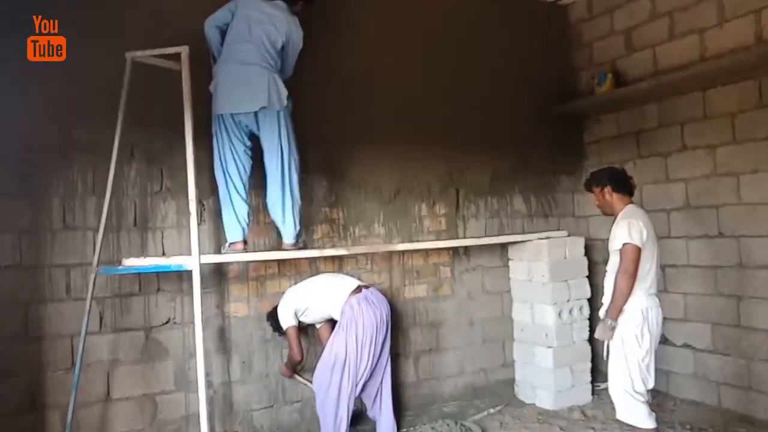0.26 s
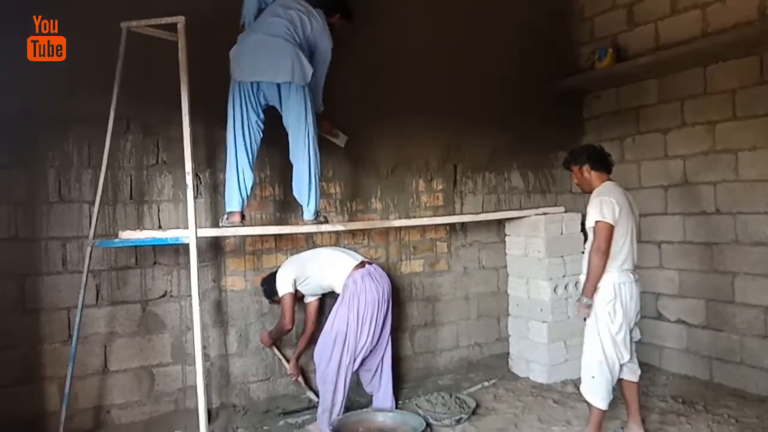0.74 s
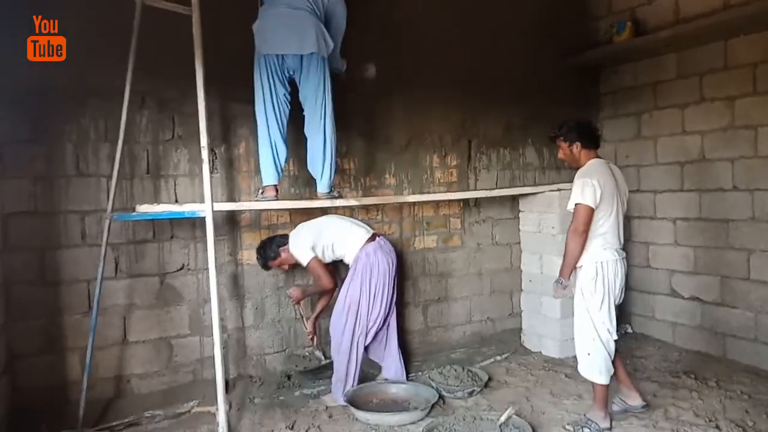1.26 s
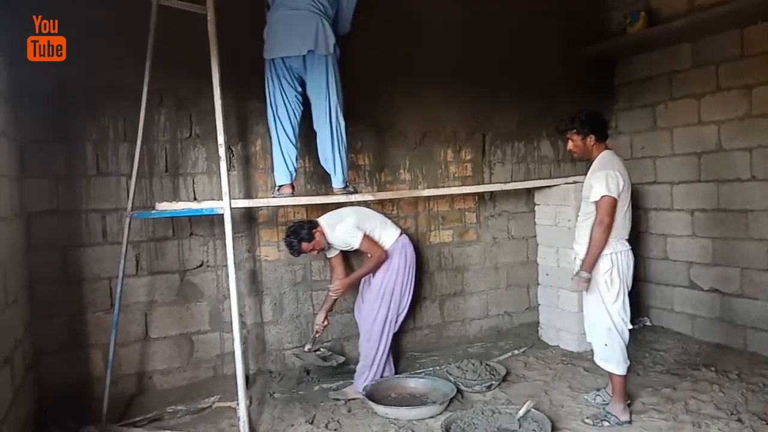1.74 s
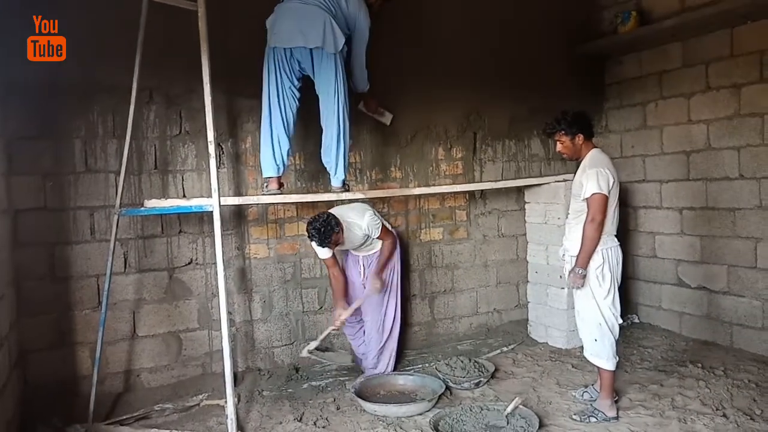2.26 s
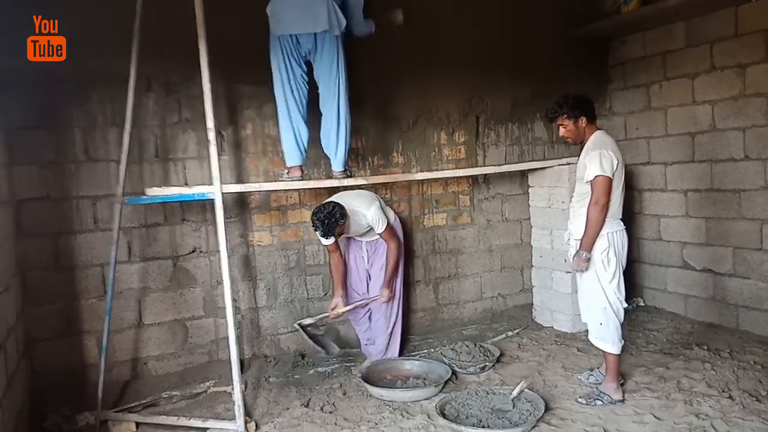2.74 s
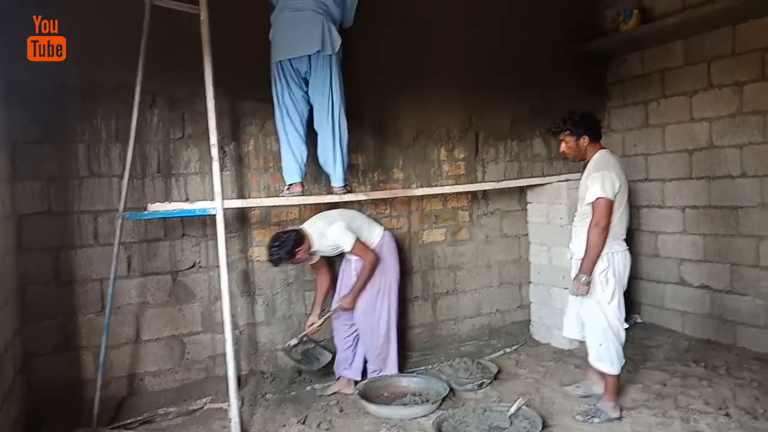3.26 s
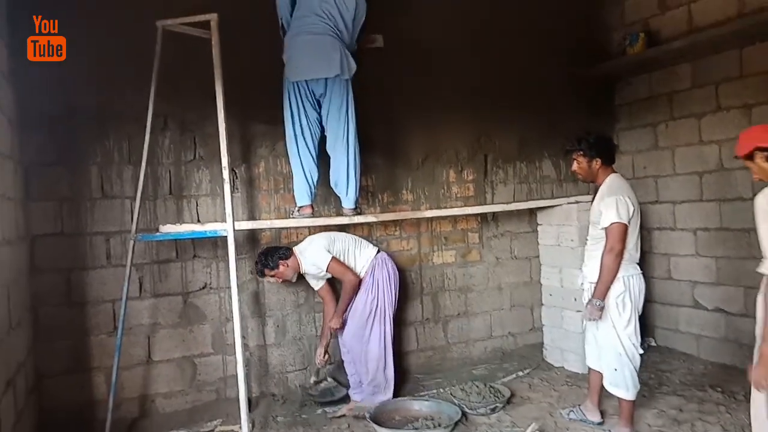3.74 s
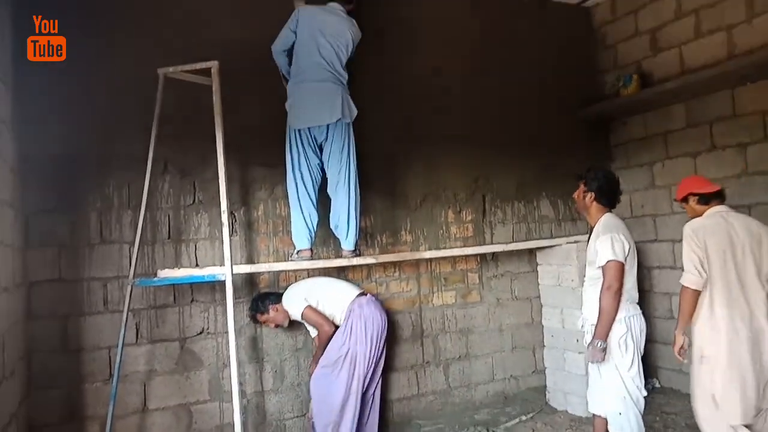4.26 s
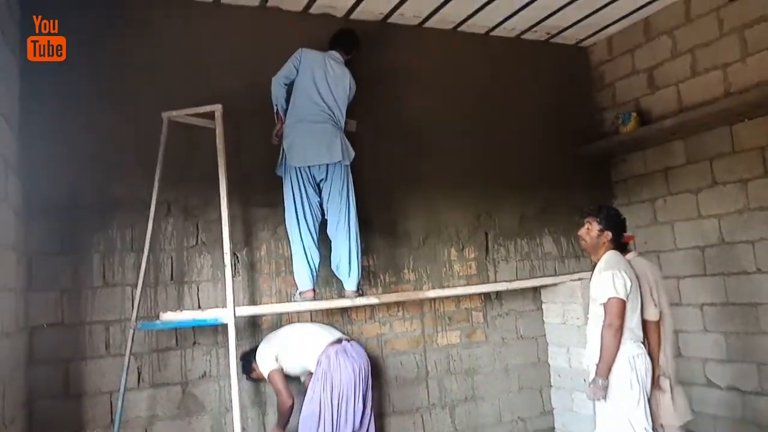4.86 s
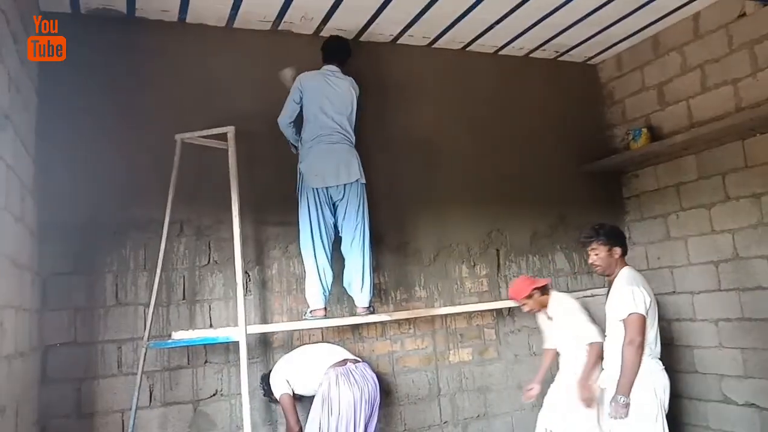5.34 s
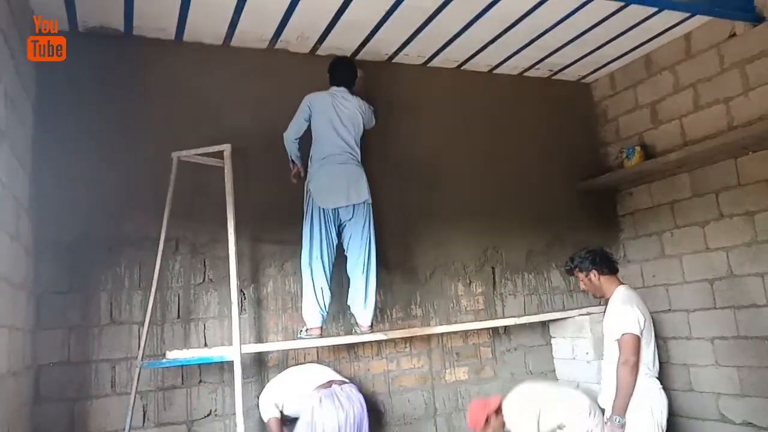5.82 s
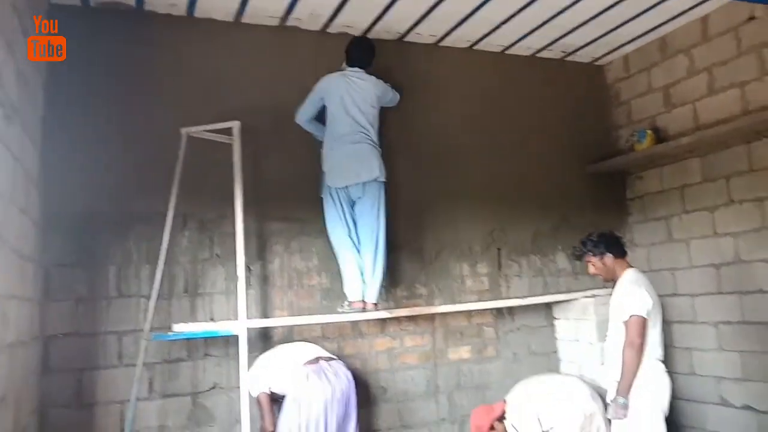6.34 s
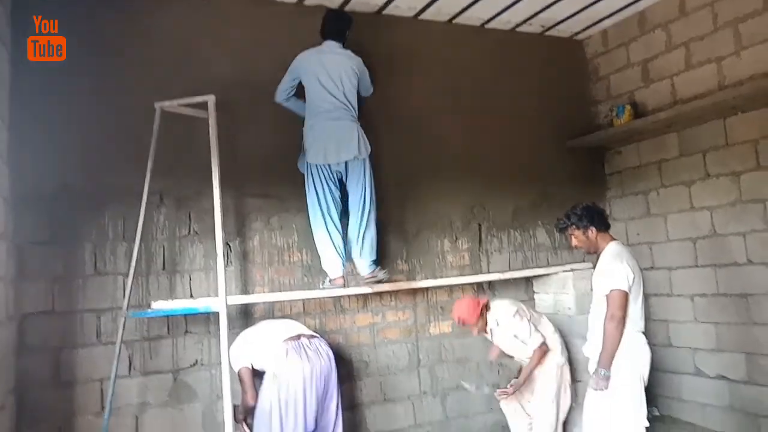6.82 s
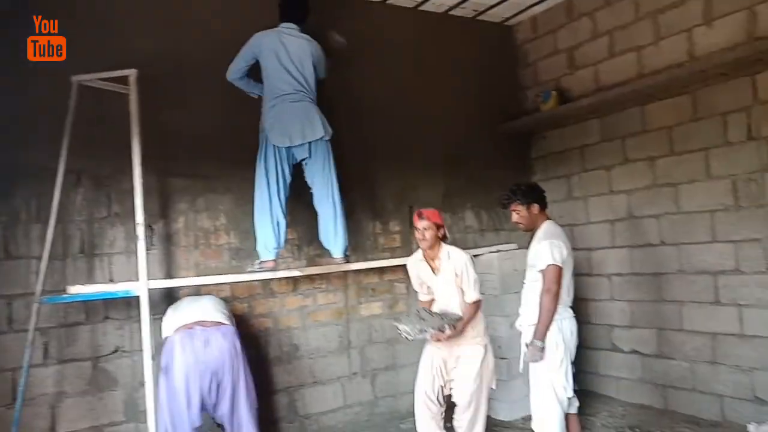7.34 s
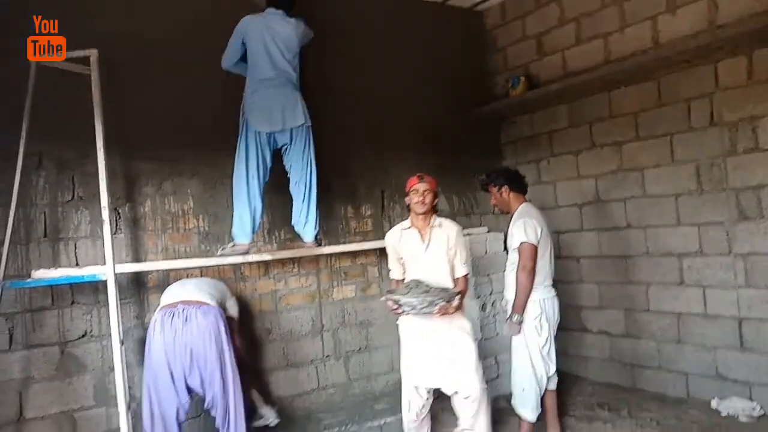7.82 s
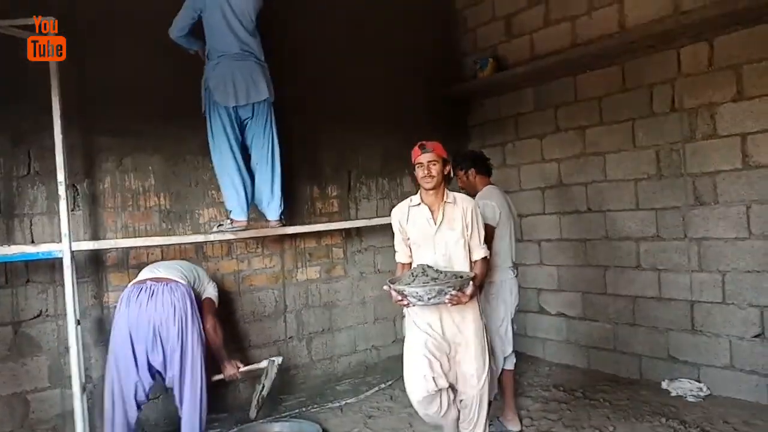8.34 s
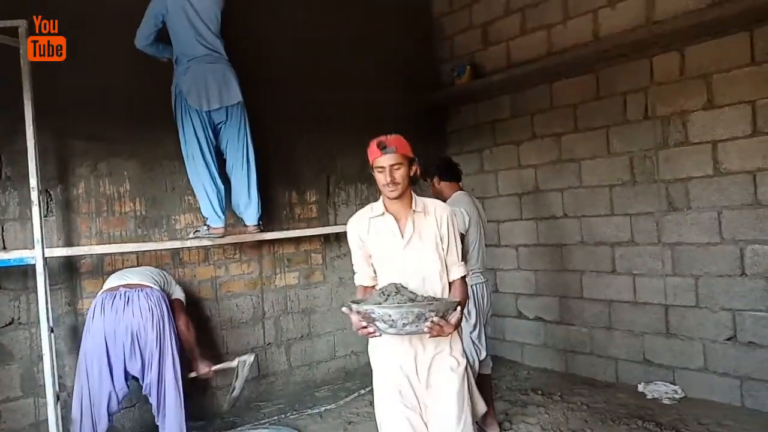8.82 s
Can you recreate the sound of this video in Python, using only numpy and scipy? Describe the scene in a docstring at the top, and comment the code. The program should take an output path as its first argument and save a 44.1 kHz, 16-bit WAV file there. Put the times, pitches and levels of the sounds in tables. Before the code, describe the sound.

In a bare block room, a steel trowel sweeps wet mortar in hissing, rasping strokes. A shovel crunches and scrapes at the start, then clanks sharply once. After calmer strokes, wet clods plop, a pan drags and trowelling becomes nearly continuous, before a hard shovel scrape near the end. Heard from a few metres away with short wall reflections; a slow distant engine barely thuds in the background.

```python
"""Bare block room, plastering: a steel trowel sweeps sandy wet mortar over the wall in hissing, rasping strokes.
A shovel scrapes, jabs and clanks on the gritty floor, a pan is dragged, wet clods flop down.
Far off, a slow single-cylinder engine thuds under a faint outdoor wash.
Friction is coloured random grains under motion envelopes; steel is ringing modes; clods are band-passed grains.
The walls add reflections; quiet pauses are turned down and the top is cut steeply."""
import sys
import numpy as np
from scipy import signal
from scipy.fft import rfft, irfft, next_fast_len
from scipy.io import wavfile
from scipy.ndimage import uniform_filter1d

SR = 44100
rng = np.random.default_rng(int(sys.argv[2]) if len(sys.argv) > 2 else 0)


def to_wav(s):
    """Save 16-bit WAV."""
    ch = np.atleast_2d(s).T  # columns
    pcm = np.round(np.clip(ch, -1, 1) * 32767)  # PCM
    wavfile.write(sys.argv[1], SR, pcm.astype(np.int16))


N = 400428
TIME = np.arange(N) / SR


def from_db(db):
    """Decibels to gain."""
    return 10 ** (np.asarray(db) / 20)


def rms_one(x):
    """Scale to rms 1."""
    return x / np.sqrt(np.mean(x ** 2) + 1e-20)


def at_hz(points, hz, axis=1):
    """Read one table column on a log-frequency axis."""
    points = np.array(points)
    return np.interp(np.log(np.maximum(hz, 1)), np.log(points[:, 0]), points[:, axis])


def coloured(x, spectrum):
    """Filter a steady signal by a spectrum table; rms 1."""
    gain = from_db(at_hz(spectrum, np.fft.rfftfreq(N, 1 / SR)))
    return rms_one(irfft(rfft(x) * gain, N))


def filtered(x, order, cutoff_hz, kind):
    """Butterworth filter."""
    return signal.sosfilt(signal.butter(order, cutoff_hz, kind, fs=SR, output="sos"), x)


def drift(knots_per_s):
    """Random wander of rms 1: straight lines between random knots."""
    knots = rng.standard_normal(8000)
    return rms_one(np.interp(TIME * knots_per_s, np.arange(len(knots)), knots))


def grains(per_s, spread_db):
    """Random clicks of uneven size and either sign; rms 1."""
    sizes = from_db(spread_db * np.minimum(rng.exponential(1, N), 4))
    signs = rng.choice([-1, 1], N)
    return rms_one(sizes * signs * (rng.random(N) < per_s / SR))


def fade(age_s, t60_s):
    """Exponential decay, 60 dB in t60_s."""
    return np.exp(-np.log(1000) * age_s / t60_s)


def ring(clicks, hz, t60_s):
    """Two-pole resonator: a unit click starts a decaying sine of height about 1."""
    r, w = fade(1 / SR, t60_s), 2 * np.pi * hz / SR
    return signal.lfilter([0, np.sin(w)], [1, -2 * r * np.cos(w), r * r], clicks + 1e-18)


def burst(start_s, t60_s, rise_s):
    """Envelope that rises quickly and dies away, at most 1 s long."""
    out, first = np.zeros(N), max(int(start_s * SR), 0)
    age = TIME[:min(SR, N - first)]
    out[first:first + len(age)] = (1 - np.exp(-age / rise_s)) * fade(age, t60_s)
    return out


# room acoustics: f/Hz, left-right likeness/0-1, t60/s
ROOM_ACOUSTICS = [(99.8, 0.87, 0.64), (315, 0.93, 0.26), (593, 0.73, 0.25), (1200, 0.09, 0.19),
                  (4000, 0.01, 0.14), (14000, 0.11, 0.099)]


def wall_echoes(build_s=0.0031):
    """Dense reflection tail for one source position, alike on both sides only in the bass."""
    size = next_fast_len(SR // 2)
    age, hz = TIME[:size], np.fft.rfftfreq(size, 1 / SR)
    mid, side = rfft(rng.standard_normal((2, size)))
    alike = np.clip(at_hz(ROOM_ACOUSTICS, hz), 0, 1)
    field = np.sqrt(1 + alike) * mid + np.sqrt(1 - alike) * side * [[1], [-1]]
    edges_hz, response = np.r_[0, np.geomspace(150, SR / 2, 8)], 0
    for low, high in zip(edges_hz, edges_hz[1:]):
        band = irfft(field * ((hz >= low) & (hz < high)), size)
        response = response + band * fade(age, at_hz(ROOM_ACOUSTICS, high, axis=2))
    built_up = response * (1 - np.exp(-age / build_s))
    # rough walls scatter all pitches about equally: keep the timing, level the colour
    scatter = np.exp(1j * np.angle(rfft(built_up)))
    return irfft(scatter, size)[:, :size // 2]


def room(x, direct_db, lag_s=0, moves_per_s=30, shift_db=20, count=4):
    """Direct sound plus reflections; with count > 1 their pattern shifts as the tool moves."""
    shares = from_db([shift_db * drift(moves_per_s) for _ in range(count)])
    shares /= np.sqrt(np.sum(shares ** 2, axis=0))
    echoes = sum(signal.oaconvolve((x * share)[None], wall_echoes(), axes=1)[:, :N] for share in shares)
    # a source on the right reaches the left side later
    direct = np.array([np.interp(TIME - lag_s, TIME, x), x])
    direct_gain = from_db(direct_db)
    return (echoes + direct_gain * direct) / np.sqrt(1 + direct_gain ** 2)


# outdoor wash spectrum: f/Hz, relative level/dB
AIR_SPECTRUM = [(25, -44), (60, 7), (140, -4), (300, -6), (700, -9), (1600, -10.5), (4000, -16),
                (7000, -25.5), (15000, -28)]


def air(level_db=-64.5, width_hz=500):
    """Faint outdoor wash through the open doorway: coloured noise, wide only above the bass."""
    mid, side = coloured(rng.standard_normal((2, N)), AIR_SPECTRUM)
    side = filtered(side, 1, width_hz, "high")
    return from_db(level_db) * (mid + side * [[1], [-1]])


FIRINGS_PER_S, FIRST_FIRING_S = 11.356, .043


def engine(level_db=-65.5, uneven_db=2.5, low_hz=52, high_hz=104, echo_db=-2.5, echo_t60_s=.3):
    """One exhaust puff per firing, blurred by outdoor echoes; only its bass carries this far."""
    firings = (np.arange(FIRST_FIRING_S, N / SR, 1 / FIRINGS_PER_S) * SR).astype(int)
    puffs = np.zeros(N)
    puffs[firings] = from_db(uneven_db * rng.standard_normal(len(firings)))
    tails = signal.lfilter([1], [1, -fade(1 / SR, echo_t60_s)], puffs)
    echoes = tails * rng.standard_normal(N)
    exhaust = rms_one(puffs) + from_db(echo_db) * rms_one(echoes)
    return from_db(level_db) * rms_one(filtered(exhaust, 3, [low_hz, high_hz], "band"))


def swelling(age_s, length_s, swell_db):
    """Gain that changes by swell_db over a movement, 0 dB at mid-way."""
    return from_db(swell_db * (np.clip(age_s / length_s, 0, 1) - .5))


def slide(start_s, length_s, swell_db, settle_s, attack_s=0.022):
    """Floor push: quick start, steady swell or wane, then the grit settles."""
    age = TIME - start_s
    attack = np.clip(age / attack_s, 0, 1)
    settling = np.exp(-np.clip((age - length_s) / settle_s, 0, 20))
    return attack * swelling(age, length_s, swell_db) * settling


# loaded pan modes: f/Hz, relative level/dB, t60/s
PAN_MODES = [(345, -9, .08), (455, -12, .06), (615, 0, .11), (700, -5, .08), (900, -8, .05)]
# steel mortar pan pulled over the floor:
# t/s, length/s, level/dB, swell/dB, settling time constant/s, pitch ratio (higher when empty)
PAN_PULLS = [(0.582, 0.16, -48.5, 11, 0.076, 1.17), (6.21, 0.45, -49, -1.5, 0.12, 1.0)]


def pan():
    """Grit catching under the pan sets its damped bowl droning."""
    catches, out = grains(per_s=350, spread_db=0.0), np.zeros(N)
    for start_s, length_s, db, swell_db, settle_s, ratio in PAN_PULLS:
        modes = [from_db(mode_db) * ring(catches, hz * ratio, t60_s) for hz, mode_db, t60_s in PAN_MODES]
        bowl = rms_one(sum(modes))
        out += from_db(db) * bowl * slide(start_s, length_s, swell_db, settle_s)
    return out


# wet mortar landing: t/s, level/dB (before gain_db), f/Hz, t60/s
MORTAR_CLODS = [(0.223, -32, 294, 0.083), (0.364, -32, 298, 0.091), (2.685, -34.5, 242, 0.36),
                (2.717, -33.5, 300, 0.32), (2.832, -34.5, 290, 0.24), (4.836, -49.5, 430, 0.075),
                (4.941, -38, 403, 0.034), (5.533, -37.5, 312, 0.25), (5.593, -47, 270, 0.37),
                (6.047, -46, 343, 0.17), (6.621, -40.5, 472, 0.28), (6.976, -36.5, 248.6, 0.35),
                (7.121, -45.5, 231.4, 0.13), (7.477, -43, 495, 0.08), (8.44, -48, 293, 0.075),
                (8.571, -35, 277, 0.59)]


def mortar(gain_db=0.5, width_ratio=1.566):
    """A clod lands as a cluster of soft, dull plops: band-passed grains."""
    plops, out = grains(per_s=2300, spread_db=3.0), np.zeros(N)
    for start_s, db, hz, t60_s in MORTAR_CLODS:
        envelope = burst(start_s, t60_s, rise_s=0.0024)
        thud = filtered(plops + 1e-18, 2, [hz / width_ratio, hz * width_ratio], "band")
        thud /= np.sqrt(np.average(thud ** 2, weights=envelope ** 2))
        out += from_db(db + gain_db) * envelope * thud
    return out


# shovel blade modes: f/Hz, relative level/dB, t60/s
BLADE_MODES = [(865, -8, .11), (1281, -8, .12), (1701, -7, .11), (1965, -7, .14), (2660, -7, .17),
               (2790, -7, .13), (2865, -4, .14), (3521, -10, .13), (3800, -8, .08), (4150, -7, .05),
               (4613, -16, .11)]
# impact noise spectrum: f/Hz, relative level/dB
CRACK_SPECTRUM = [(300, -22), (800, -12.5), (2000, 2.5), (4100, -3), (5200, -13.5), (7000, -21),
                  (11000, -43), (15000, -53)]
# blade striking the floor: t/s, level/dB (of the crack; ringing adds mode level and ring_db)
BLADE_CLANKS = [(1.668, -21), (7.956, -33.5)]
REBOUND_SPACING_S, REBOUND_DB = 0.018, -14  # spacing varies by up to 20 %


def shovel_clank(ring_db=-3.5, crack_t60_s=0.038, count=4):
    """Each contact and its rebounds crack on the concrete and ring the blade."""
    contacts = []
    for start_s, db in BLADE_CLANKS:
        for k in range(count):
            delay_s = k * REBOUND_SPACING_S * rng.uniform(.8, 1.2)
            contacts.append((start_s + delay_s, db + REBOUND_DB * (k > 0)))
    times_s, levels_db = np.transpose(contacts)
    cracks = sum(from_db(db) * burst(t, crack_t60_s, rise_s=0.00029) for t, db in contacts)
    out = coloured(rng.standard_normal(N), CRACK_SPECTRUM) * cracks
    for hz, mode_db, t60_s in BLADE_MODES:
        clicks = np.zeros(N)
        signs = rng.choice([-1, 1], len(times_s))
        clicks[(times_s * SR).astype(int)] = from_db(levels_db + mode_db + ring_db) * signs
        out += ring(clicks, hz, t60_s)
    return out


# crushed stones spectrum: f/Hz, relative level/dB
GRIT_SPECTRUM = [(40, -25), (120, -11.5), (350, -22.5), (620, 4), (1000, 1), (1350, 4.5), (2200, 3.5),
                 (3000, 0), (4200, -6), (5200, -13.5), (7000, -26.5), (10000, -43), (15000, -63.5)]
# shovel jabbing into grit: t/s, level/dB, t60/s
SHOVEL_JABS = [(0.004, -21, 0.04), (0.233, -34, .1), (0.52, -31.5, 0.077), (0.663, -33, 0.26),
               (2.736, -39, .15), (2.824, -39, 0.18), (4.9401, -32.5, 0.016), (5.594, -40, 0.065),
               (6.036, -39, 0.11), (6.592, -31, .05), (6.969, -39.5, 0.32), (7.958, -41, 0.11),
               (8.357, -26, 0.16), (8.379, -21.5, 0.055), (8.435, -20.5, 0.18)]


def shovel_jabs():
    """Each thrust crushes many small stones at once: bursts of coloured grains."""
    crunch = coloured(grains(per_s=4700, spread_db=-1.5), GRIT_SPECTRUM)
    return crunch * sum(from_db(db) * burst(t, t60_s, rise_s=0.00039) for t, db, t60_s in SHOVEL_JABS)


# rumble spectrum of the shovel's load: f/Hz, relative level/dB
LOAD_SPECTRUM = [(35, -48), (110, -19.5), (190, -31.5), (265, 3), (350, 6), (430, -0.5), (600, -5),
                 (1200, -13.5), (4000, -50.5)]
# shovel pushes: t/s, length/s, grit level/dB (before grit_gain_db), load level/dB, swell/dB,
# settling time constant/s
SHOVEL_PUSHES = [(0, .11, -41.5, -39.5, -13, 0.092), (0.177, .19, -35, -38, 3, 0.033),
                 (0.508, 0.14, -36, -50, 2.5, 0.071), (0.834, .25, -69, -62, 4.5, 0.021),
                 (1.847, 0.41, -65.5, -66, -0.5, 0.017), (3.133, 0.28, -62, -64, -0.5, 0.3),
                 (3.648, 0.044, -62, -61, -12, 0.033), (4.501, 0.11, -67.5, -66, -3, .04),
                 (4.83, 0.07, -60, -66.5, -9, 0.042), (5.736, .11, -47.5, -59, -12.5, 0.12),
                 (6.03, 0.18, -55, -67, -1, 0.021), (6.198, 0.25, -44.5, -52, 7, 0.17),
                 (7.068, 0.079, -58, -58.5, -13, 0.094), (7.474, 0.11, -69.5, -70, -2, 0.047),
                 (7.965, 0.18, -53, -63.5, -2, 0.029), (8.371, 0.075, -27.5, -32.5, 5.5, 0.026),
                 (8.535, 0.22, -55, -60, 7, .03), (8.747, 0.072, -40.5, -48, 1.5, 0.034)]


def shovel_scrape(grit_gain_db=3.0, slip_db=3.0, steel_db=-25.0):
    """The blade sticks and slips over stones, which crunch and ring it faintly; its load rumbles."""
    slip = from_db(slip_db * drift(knots_per_s=95))
    stones = grains(per_s=3000, spread_db=3.5)
    slides = np.array([slide(t, length_s, swell_db, settle_s)
                       for t, length_s, _, _, swell_db, settle_s in SHOVEL_PUSHES])
    grinding, weight = from_db(np.array(SHOVEL_PUSHES)[:, 2:4].T) @ slides
    steel = rms_one(sum(from_db(db) * ring(stones, hz, t60_s) for hz, db, t60_s in BLADE_MODES))
    crunch = rms_one(coloured(stones, GRIT_SPECTRUM) + from_db(steel_db) * steel)
    load = coloured(grains(per_s=1900, spread_db=2.5), LOAD_SPECTRUM)
    return slip * (crunch * grinding * from_db(grit_gain_db) + load * weight)


def stroke(start_s, length_s, swell_db, speed_up_s=.24, slow_down_s=0.19):
    """Trowel speed: the arm gets going, sweeps on while swelling or waning, and comes to rest."""
    age = TIME - start_s
    ease_in = np.sin(np.pi / 2 * np.clip(age / speed_up_s, 0, 1))
    ease_out = np.sin(np.pi / 2 * np.clip((length_s - age) / slow_down_s, 0, 1))
    return (ease_in * ease_out) ** 2 * swelling(age, length_s, swell_db)


# sand hiss spectrum: f/Hz, relative level/dB
SAND_SPECTRUM = [(150, -26), (500, -16), (950, -15.5), (1500, -9), (2300, -2.5), (3000, 1.5), (4100, 0),
                 (5000, -7), (6200, -11), (7500, -18), (9800, -20.5), (11500, -28), (14500, -20),
                 (16000, -32.5)]
# blade rasp spectrum before pitch shift: f/Hz, relative level/dB
RASP_SPECTRUM = [(300, -33), (700, -12.5), (1000, -12), (1550, 1), (1900, 5), (2400, 6.5), (3000, -5.5),
                 (4500, -22.5), (9000, -56)]
# trowel strokes: t/s, length/s, hiss level/dB, rasp level/dB (both before gains), wet film level/dB,
# swell/dB
TROWEL_STROKES = [(-.3, 0.52, -36, -43, -66, -31), (0.03, 0.86, -56, -75, -74, -5),
                  (1.02, 0.72, -44, -60, -58, 2.5), (2.44, 0.73, -41.5, -47.5, -70, 2),
                  (3.645, 0.68, -47, -54.5, -57, 10), (4.816, 0.72, -45.5, -52.5, -51.5, 0.5),
                  (5.384, 0.709, -50.5, -54, -54.5, 2), (5.93, 0.45, -48.5, -53, -54.5, -10),
                  (6.207, 0.63, -49, -49.5, -53.5, -2), (6.552, 0.72, -51.5, -61, -57, -9),
                  (6.991, 0.38, -48, -53, -51, -8), (7.2, 0.59, -49.5, -72, -56, 2),
                  (7.573, 0.6, -50, -74, -55, 4), (7.948, 0.36, -50.5, -71, -63, -7),
                  (8.135, 0.66, -48, -66, -61, -3), (8.539, 0.64, -53, -76, -59.5, -5.5)]
# blade biting into the mortar: t of peak/s, level/dB (before gains), build-up and ease-off time constant/s,
# rasp pitch shift/octaves
TROWEL_BITES = [(0.01, -24, 0.02, 0.18), (1.28, -36, 0.062, -0.086), (1.654, -41, 0.034, -0.25),
                (1.915, -55.5, 0.023, 0.13), (2.57, -35.5, 0.045, -0.17), (3.685, -57, 0.027, .5),
                (4.885, -56, 0.023, 0.38), (5.022, -35, .04, .35), (5.36, -40.5, 0.036, .3),
                (7.971, -37.5, .018, 0.053)]
BITE_HISS_DB = -7  # a bite also drags more sand
TILT_S, FILM_HZ = .13, 6000  # pitch slide time constant; wet film sizzles above this


def trowel(hiss_gain_db=3.0, rasp_gain_db=3.0, judder_db=0.6):
    """Sand hisses, wet film sizzles; pressing harder makes the blade rasp, its pitch sliding with tilt."""
    judder = from_db(judder_db * drift(knots_per_s=55))
    speeds = np.array([stroke(t, length_s, swell_db) for t, length_s, _, _, _, swell_db in TROWEL_STROKES])
    # overlapping strokes add in power
    stroke_gains = from_db(np.array(TROWEL_STROKES)[:, 2:5].T)
    sweep, pressure, wetness = np.sqrt(stroke_gains ** 2 @ speeds ** 2)
    bites = sum(from_db(db) * np.exp(-np.minimum(abs(TIME - t) / ease_s, 20))
                for t, db, ease_s, _ in TROWEL_BITES)
    tilt_octaves = sum(octaves * np.exp(-np.minimum(((TIME - t) / TILT_S) ** 2, 20))
                       for t, _, _, octaves in TROWEL_BITES)
    hiss = coloured(grains(per_s=9000, spread_db=5.5), SAND_SPECTRUM)
    hiss *= np.hypot(sweep, from_db(BITE_HISS_DB) * bites) * from_db(hiss_gain_db)
    sizzle = coloured(grains(per_s=4000, spread_db=3.5), SAND_SPECTRUM)
    film = rms_one(filtered(sizzle, 3, FILM_HZ, "high")) * wetness
    rasp = coloured(grains(per_s=2500, spread_db=4.0), RASP_SPECTRUM)
    # read faster or slower to slide the pitch
    rasp = np.interp(np.cumsum(2 ** tilt_octaves) % N, np.arange(N), rasp)
    rasp *= np.hypot(pressure, bites) * from_db(rasp_gain_db)
    return (hiss + film + rasp) * judder


def scene():
    """The work is a few metres away, so most of the scraping arrives off the walls."""
    # balance columns: left/dB, right/dB
    wall = room(trowel(), direct_db=-9.0, lag_s=.00002, count=6) * from_db([[-.1], [.1]])
    floor = room(shovel_scrape(), direct_db=-14.0, count=4) * from_db([[.4], [-.4]])
    blows = room(shovel_jabs() + shovel_clank(), direct_db=-1.0, count=2) * from_db([[.4], [-.4]])
    material = room(mortar() + pan(), direct_db=-3.0, count=1)
    return wall + floor + blows + material + engine() + air()


def record(dry, threshold_db=-50.5, slope=1.0, depth_db=18.5, window_s=0.085, cutoff_hz=15500):
    """A noise suppressor turns the quiet pauses down; the top is cut steeply."""
    power = uniform_filter1d(np.mean(dry ** 2, axis=0), int(window_s * SR))
    level_db = 10 * np.log10(power + 1e-12)
    cut_db = np.clip(slope * (threshold_db - level_db), 0, depth_db)
    low_pass = signal.ellip(12, .1, 80, cutoff_hz, fs=SR, output="sos")
    return signal.sosfilt(low_pass, dry * from_db(-cut_db))


dry = scene()
out = record(dry)
to_wav(out)
```